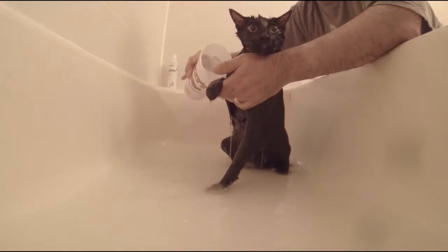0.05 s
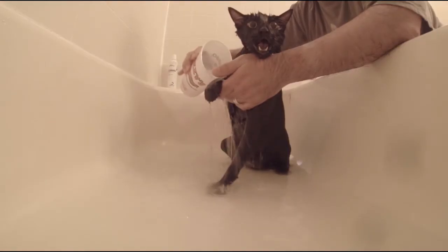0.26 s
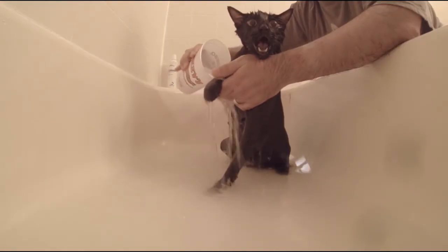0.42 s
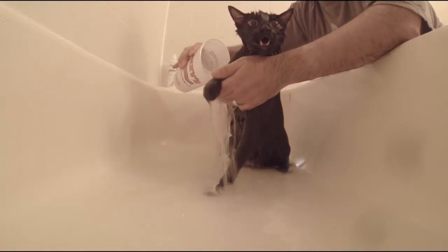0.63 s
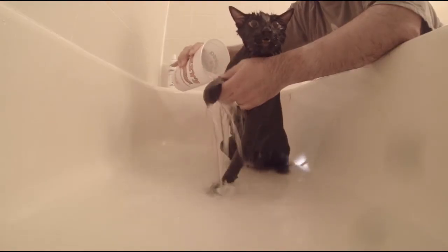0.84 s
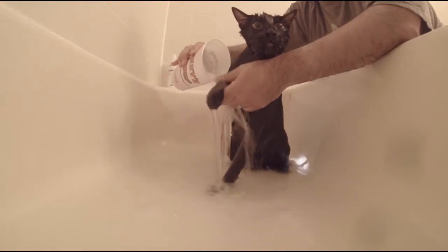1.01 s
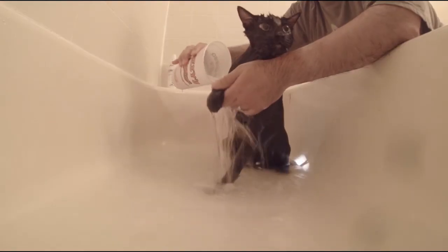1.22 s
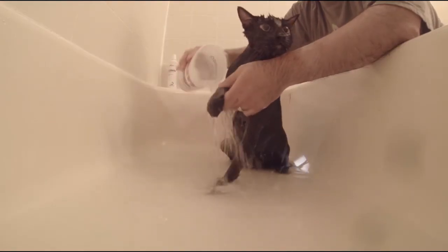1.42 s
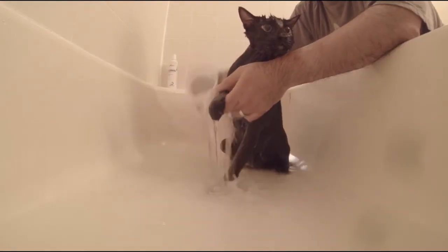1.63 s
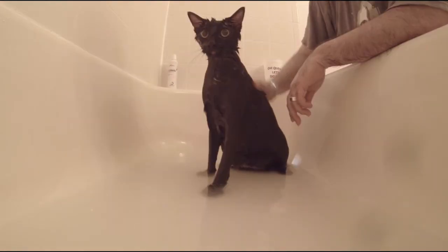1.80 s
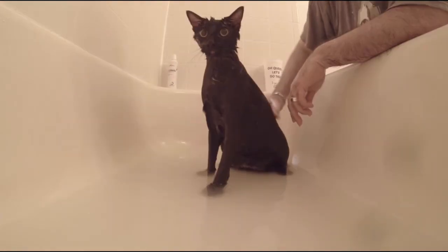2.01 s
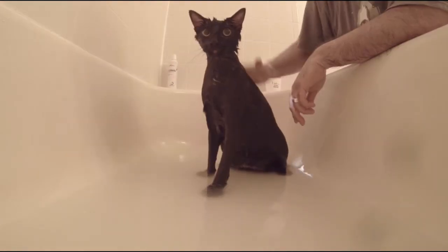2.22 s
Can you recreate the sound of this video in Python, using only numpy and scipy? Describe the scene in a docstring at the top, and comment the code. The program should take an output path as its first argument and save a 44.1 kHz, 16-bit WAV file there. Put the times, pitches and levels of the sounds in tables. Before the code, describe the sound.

Water pours and splashes into a bathtub while a cat meows once.

```python
"""A thin trickle plinks in a small hard bathroom, then swells as a cup of water is poured over a wet cat.
The broken stream drives the tub's low modes, slaps the shallow bath, throws spray and traps bubbles
that ring as resonators. The cat meows once, its harmonics shaped by the resonances of mouth and throat.
The pouring is cut off abruptly, leaving quiet room tone, a few last drips and two soft nudges of the tub."""
import sys
import numpy as np
from scipy import signal
from scipy.fft import rfft, irfft
from scipy.io import wavfile
from scipy.ndimage import uniform_filter1d

SR = 44100
rng = np.random.default_rng(int(sys.argv[2]) if len(sys.argv) > 2 else 0)


def store_pcm(level_fs):
    """Save levels as 16-bit WAV."""
    pcm = np.round(np.clip(level_fs, -1, 1) * 32767).astype(np.int16)
    wavfile.write(sys.argv[1], SR, np.atleast_2d(pcm).T)


N = 103635
T = np.arange(N) / SR
POUR_S, POUR_RISE_S, CUT_S = 0.267, 0.03, 1.716   # the stream lands, builds and is cut off


def from_db(db):
    """Decibels to amplitude ratio."""
    return 10 ** (np.asarray(db) / 20)


def rms_one(x):
    """Normalisation to unit rms."""
    return x / np.sqrt(np.mean(x ** 2) + 1e-20)


def in_time(rows):
    """Linear interpolation of each column at every sample."""
    times, *columns = np.transpose(rows)
    return [np.interp(T, times, column) for column in columns]


def filtered(x, hz, kind="band"):
    """Maximally flat filter: a band-pass unless another kind is given."""
    return signal.sosfilt(signal.butter(2, hz, kind, fs=SR, output="sos"), x)


def colour(x, spectrum):
    """Minimum-phase filtering to a given spectrum; white noise keeps its power."""
    size = 8192
    hz, db = np.transpose(spectrum)
    grid = np.maximum(np.arange(size // 2 + 1) * SR / size, 1)
    octaves_outside = np.maximum(0, np.log2(hz[0] / grid)) + np.maximum(0, np.log2(grid / hz[-1]))
    gain_db = np.interp(np.log(grid), np.log(hz), db) - 20 * octaves_outside
    cepstrum = irfft(np.log(from_db(gain_db)))
    cepstrum[1:size // 2] *= 2   # folding the cepstrum makes the filter causal
    cepstrum[size // 2 + 1:] = 0
    response = irfft(np.exp(rfft(cepstrum)))
    return signal.fftconvolve(x, response / np.linalg.norm(response))[:N]


def drops(per_s, spread_db, even_s=0.022):
    """Shot noise: random impacts of uneven size, their power levelled over even_s."""
    sizes = from_db(spread_db * np.minimum(rng.exponential(1, N), 5)) * rng.choice([-1, 1], N)
    clicks = sizes * (rng.random(N) < per_s / SR)
    power = np.abs(uniform_filter1d(clicks ** 2, max(int(even_s * SR), 2)))
    return clicks / np.sqrt(power + 1e-4)


def bursts(times, levels_db, decay_s):
    """Exponential decay: an envelope that jumps at each time and dies away."""
    return sum(from_db(db) * (T >= s) * np.exp(-np.maximum(T - s, 0) / decay_s)
               for s, db in zip(times, levels_db))


# spectrum of the room's background: frequency_hz, gain_db
ROOM_SPECTRUM = [(30, -11), (59, -26), (129, 0), (253, -11), (426, -23.5), (1170, -17.5), (1600, -18),
                 (15000, -27.5)]
def room_tone(level_db=-67):
    """Stationary noise: a low rumble under a faint hiss."""
    return from_db(level_db) * colour(rng.standard_normal(N), ROOM_SPECTRUM)


def bathroom(x, wet_db, t60_s=0.29):
    """Reverberation: dense reflections from tub and tiles follow the direct sound and decay exponentially."""
    t, wet = T[:SR // 2], from_db(wet_db)
    tail = rng.standard_normal(len(t)) * from_db(-60 * t / t60_s) * (t > 0.002)
    tail = filtered(tail / np.linalg.norm(tail), hz=[364, 6700])
    return (x + wet * signal.fftconvolve(x, tail)[:N]) / np.sqrt(1 + wet ** 2)


# modes of the tub's shell: frequency_hz, gain_db, t60_s
TUB_MODES = [(82.6,-9.5,0.23),(144.5,2.5,0.15),(164.85,6,0.23),(182,-4,0.4),(236.9,1.5,0.2),(298,-35,0.033),(345.4,-6.5,0.3)]
def tub(force):
    """Modal resonance: the shell answers a force with a sum of damped low tones."""
    t = T[:SR // 2]
    response = sum(from_db(db - 60 * t / t60) * np.cos(2 * np.pi * hz * t) for hz, db, t60 in TUB_MODES)
    response = filtered(response, hz=[75, 480])
    return signal.fftconvolve(force, response / np.linalg.norm(response))[:N]


# the cat's pushes on the tub: start_s, level_db
CAT_NUDGES = [(2.009,-64),(2.328,-59.5)]
def nudges():
    """Transient excitation: the cat shifts, and each brief noisy push sets the shell ringing."""
    return tub(rng.standard_normal(N) * bursts(*np.transpose(CAT_NUDGES), decay_s=0.027))


def froth(per_s, low_hz, high_hz, cycles, spread_db):
    """Superposed resonators: bubbles of random time and pitch, each falling 60 dB in `cycles` periods."""
    clicks = drops(per_s, spread_db, even_s=0.06)
    size_class, out = rng.integers(0, 24, N), 0
    for k, hz in enumerate(np.geomspace(low_hz, high_hz, 24)):
        radius, angle = from_db(-60 * hz / (cycles * SR)), 2 * np.pi * hz / SR
        feedback = [1, -2 * radius * np.cos(angle), radius ** 2]
        out = out + signal.lfilter([0, np.sin(angle)], feedback, clicks * (size_class == k) + 1e-18)
    return rms_one(out)


def trickle():
    """Air entrainment: before the pour, a thread of water off the cat traps bubbles and taps the tub."""
    ring = from_db(-56) * froth(per_s=130, low_hz=1220, high_hz=1480, cycles=30, spread_db=1)
    drumming = from_db(-60) * tub(drops(per_s=200, spread_db=3))
    return (ring + drumming) * np.clip((POUR_S - T) / POUR_RISE_S, 0, 1)


# stray drops on the wet tub, the last of them after the pour: start_s, centre_hz, level_db
STRAY_DROPS = [(0.29,8450,-55.5),(0.408,6400,-55),(0.356,3520,-48),(0.525,5200,-47),(0.731,2170,-37),(0.797,2310,-47),(1.115,4110,-45.5),(1.361,2070,-39.5),(1.51,3390,-43.5),(1.592,2440,-39.5),(1.824,2270,-64),(1.902,2150,-59.5),(1.91,1230,-65.5)]
def splats(from_s, until_s, attack_s=0.00037, decay_s=0.0074, edge_ratio=1.125):
    """Heavy damping: each drop in the time span excites one broad resonance with no clear pitch."""
    out, t = np.zeros(N + SR), T[:SR // 10]
    envelope = (1 - np.exp(-t / attack_s)) * np.exp(-t / decay_s)
    for s, hz, db in STRAY_DROPS:
        if from_s <= s < until_s:
            start = int(s * SR)
            burst = filtered(rng.standard_normal(len(t)) * envelope, [hz / edge_ratio, hz * edge_ratio])
            burst *= np.linalg.norm(envelope) / np.linalg.norm(burst)
            out[start:start + len(t)] += from_db(db) * burst
    return out[:N]


# single bubbles, from low plops to clear plinks: start_s, pitch_hz, level_db
SINGLE_BUBBLES = [(0.033,1430,-40),(0.072,1344,-39.5),(0.345,1190,-33.5),(0.392,772,-35),(0.517,1454,-30),(0.533,745,-32.5),(0.598,770,-33.5),(0.683,1276,-27.5),(0.702,680,-35.5),(0.715,756,-33),(0.736,445,-34.5),(0.746,586,-35),
                  (0.84,1567,-27.5),(0.984,1400,-27),(1.055,347,-27.5),(1.097,375,-30),(1.084,1470,-30),(1.106,1480,-28.5),(1.179,1382,-28),(1.326,434,-31.5),(1.374,673,-29.5),(1.376,530,-33),(1.664,1400,-30)]
def plinks(attack_s=0.00051, t60_s=0.055, rise_per_s=1):
    """Bubble resonance: trapped air pulsates as a damped sine that rises slightly in pitch."""
    out, t = np.zeros(N + SR), T[:SR // 8]
    for s, hz, db in SINGLE_BUBBLES:
        start, size = int(s * SR), 1400 / hz   # smaller bubbles sound higher and start faster
        envelope = (1 - np.exp(-t / (attack_s * size))) * from_db(db - 60 * t / t60_s)
        phase = 2 * np.pi * hz * t * (1 + rise_per_s * t / 2)
        out[start:start + len(t)] += envelope * np.sin(phase)
    return out[:N]


# course of the cry: time_s, pitch_hz, level_db
CRY = [(0.17,841.5,-76),(0.184,797.4,-48.5),(0.203,772.4,-59.5),(0.232,806,-48),(0.25,702,-34.5),(0.29,681.3,-35),(0.335,628.3,-47.5),(0.385,589.5,-51),
       (0.475,566,-39.5),(0.52,564.5,-38),(0.605,564.7,-41),(0.675,585.3,-47.5),(0.73,591.3,-55.5),(0.82,602,-69)]
# the opening mouth brightens the cry: time_s, resonance_hz, throat_gain_db
MOUTH_OPENING = [(0.18,1500,-15),(0.26,1430,-11.5),(0.335,1210,-6),(0.41,1870,3),(0.52,1680,-4),(0.68,2017,-3)]
# rasp of the voice: time_s, roughness (0 to 1)
ROUGHNESS = [(0.285,0.3),(0.325,0.84),(0.39,0.12)]
# steady resonances of the throat: centre_hz, width_hz, gain_db
THROAT_FORMANTS = [(2220,320,-6),(2850,400,-28),(3600,700,-37),(4900,600,-31)]
def meow(full_jitter=0.0462, shimmer_per_jitter=13):
    """Source and filter: a falling cry cracks into a rasp, then clears; formants weight its harmonics."""
    pitch_hz, level_db = in_time(CRY)
    mouth_hz, throat_db = in_time(MOUTH_OPENING)
    rough, = in_time(ROUGHNESS)
    jitter = full_jitter * rough   # share of the pitch
    wobble = rms_one(filtered(rng.standard_normal(N), hz=350, kind="low"))
    phase = 2 * np.pi * np.cumsum(pitch_hz * (1 + jitter * wobble)) / SR
    harmonic = np.arange(1, 11)[:, None]
    formant = lambda hz, width_hz: 1 / (1 + (2 * (harmonic * pitch_hz - hz) / width_hz) ** 2)
    throat = sum(from_db(db + throat_db) * formant(hz, width) for hz, width, db in THROAT_FORMANTS)
    gains = formant(mouth_hz, width_hz=340) + throat
    gains *= 1 - 1 / harmonic ** 2   # the small mouth radiates no fundamental
    voice = np.sum(gains * np.sin(harmonic * phase), 0) / np.sqrt(np.sum(gains ** 2, 0) / 2)
    flutter = rms_one(filtered(rng.standard_normal(N), hz=[60, 220]))
    shimmer = 1 + shimmer_per_jitter * jitter * flutter
    period_doubling = 1 + rough ** 3 * np.cos(phase / 2)   # strong and weak pulses alternate
    return from_db(level_db) * shimmer * period_doubling * voice


# spectra of slapped water, ringing bubbles and spray: frequency_hz, gain_db
SLAP_SPECTRUM = [(200,-26),(330,4.5),(400,-4),(490,4),(630,1.5),(730,2.5),(880,-12.5),(1030,2.5),(1150,-23.5),(1600,-26)]
RING_SPECTRUM = [(800,-27),(1080,-13),(1200,2.5),(1330,-0.5),(1430,5.5),(1570,-1.5),(1800,-16),(2600,-38.5)]
SPRAY_SPECTRUM = [(1200,-26.5),(1850,-7),(2100,2),(2380,1.5),(2690,-4.5),(3420,-1.5),(4550,-10),(5250,-4.5),(5910,-10.5),(7000,-8.5),(10000,-17.5),(14500,-20.5)]
# relative levels of the running water: time_s, drum_db, slap_db, bubble_db, spray_db
STREAM_LEVELS = [(0.3,-46,-57.5,-50.5,-58),(0.42,-49.5,-54,-48,-61.5),(0.66,-46,-48.5,-43.5,-57),(0.755,-48,-51,-48.5,-58.5),(0.865,-46,-50.5,-40.5,-52),(0.94,-43,-44,-43.5,-57.5),
                 (1.11,-44.5,-48,-48.5,-55.5),(1.2,-44,-51.5,-47.5,-58),(1.29,-51.5,-55.5,-51.5,-59),(1.37,-48.5,-47,-42.5,-57),(1.46,-53.5,-53.5,-47.5,-59),(1.51,-44.5,-50.5,-42.5,-57.5),(1.7,-51,-52,-48.5,-59.5)]
def stream(spray_rise_s=0.05):
    """Impact and entrainment: drops drum on the tub, slap the water, trap bubbles and throw spray."""
    drum_db, slap_db, bubble_db, spray_db = in_time(STREAM_LEVELS)
    onset = np.clip((T - POUR_S) / POUR_RISE_S, 0, 1)
    spray_onset = np.clip((T - POUR_S) / spray_rise_s, 0, 1)
    impacts = onset * drops(per_s=800, spread_db=2)
    drumming = tub(impacts * from_db(drum_db + 2))
    slapping = colour(impacts * from_db(slap_db - 2.5), SLAP_SPECTRUM)
    large_bubbles = froth(per_s=90, low_hz=318.7, high_hz=857, cycles=27, spread_db=0)
    medium_bubbles = froth(per_s=380, low_hz=959, high_hz=1769, cycles=119, spread_db=2.5)
    small_bubbles = froth(per_s=1300, low_hz=1921, high_hz=10800, cycles=34, spread_db=3)
    gurgle = from_db(slap_db - 3) * large_bubbles
    ring = from_db(bubble_db - 1.5) * rms_one(colour(medium_bubbles, RING_SPECTRUM))
    fizz = from_db(spray_db + 2.5) * rms_one(colour(small_bubbles, SPRAY_SPECTRUM))
    spray = from_db(spray_db - 3.5) * colour(drops(per_s=6200, spread_db=2.5), SPRAY_SPECTRUM)
    return drumming + slapping + onset * (gurgle + ring) + spray_onset * (fizz + spray)


# gouts of water landing, in relative levels: start_s, thud_db, slap_db, bubble_db, spray_db
GOUT_LANDINGS = [(0.28,-35.5,-52,-38,-55.5),(0.374,-35.5,-40.5,-35,-57),(0.431,-33.5,-49,-49,-61),(0.679,-36,-57,-51,-59),(0.73,-37,-41.5,-38,-57),(0.768,-35,-44.5,-43,-56.5),
                 (0.984,-53,-46.5,-38,-58),(1.051,-29,-42.5,-31.5,-65),(1.062,-34.5,-40.5,-49,-56.5),(1.1,-40.5,-47,-36.5,-57),(1.178,-38.5,-48,-32.5,-65),(1.325,-38.5,-54,-56,-57.5),
                 (1.35,-31.5,-41,-52,-66),(1.485,-37,-45,-41,-74),(1.546,-44,-42.5,-39,-61),(1.604,-27.5,-41,-31,-57),(1.662,-37.5,-43,-32.5,-54.5),(1.696,-35,-44.5,-33.5,-51)]
def gouts(decay_s=0.016):
    """Impulse response: a gout strikes tub and water with one smack, then a dying cluster of impacts."""
    start_s, thud_db, slap_db, bubble_db, spray_db = np.transpose(GOUT_LANDINGS)
    contact = np.zeros(N)
    contact[np.ceil(start_s * SR).astype(int)] = 1
    cluster = drops(per_s=2500, spread_db=4.5, even_s=0.0028)
    on_tub, on_water = 9 * contact + 0.41 * cluster, 5.3 * contact + cluster
    thud = tub(on_tub * bursts(start_s, thud_db + 3.5, decay_s))
    slap = colour(on_water * bursts(start_s, slap_db + 3.5, decay_s), SLAP_SPECTRUM)
    ring = colour(on_water * bursts(start_s, bubble_db - 2, decay_s), RING_SPECTRUM)
    spray = colour(on_water * bursts(start_s, spray_db + 3, decay_s), SPRAY_SPECTRUM)
    return thud + slap + ring + spray


def scene():
    """Superposition: water and cat until the cut, then drips and soft nudges, all over room tone."""
    water = trickle() + stream() + gouts() + plinks() + splats(0, CUT_S)
    pouring = bathroom(water, wet_db=-5.5) + bathroom(meow(), wet_db=-3.5)
    after = bathroom(nudges() + splats(CUT_S, np.inf), wet_db=-5.5)
    return (pouring * (T < CUT_S) + after + room_tone())[None]


def record(dry):
    """Band limiting: a steep elliptic low-pass removes the highest treble."""
    cutoff_hz = 15050
    return signal.sosfilt(signal.ellip(12, 0.1, 80, cutoff_hz, fs=SR, output="sos"), dry)


dry = scene()
out = record(dry)
store_pcm(out)
```